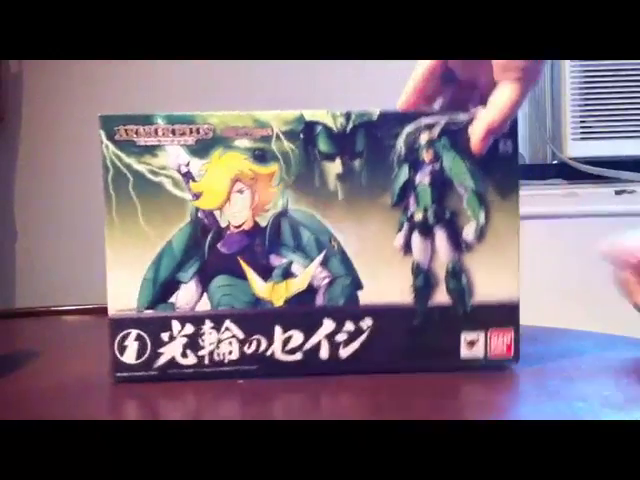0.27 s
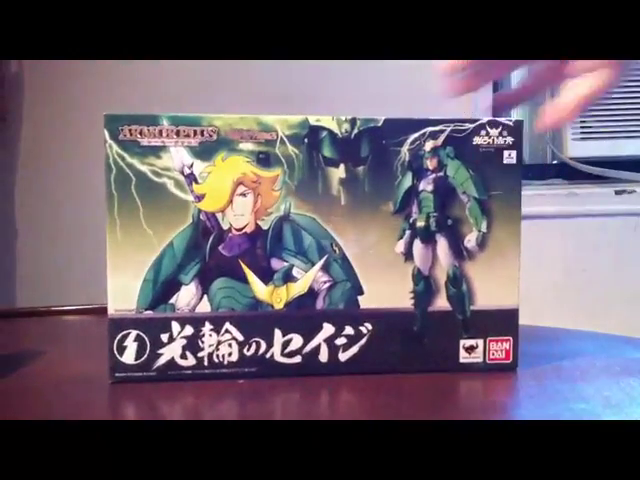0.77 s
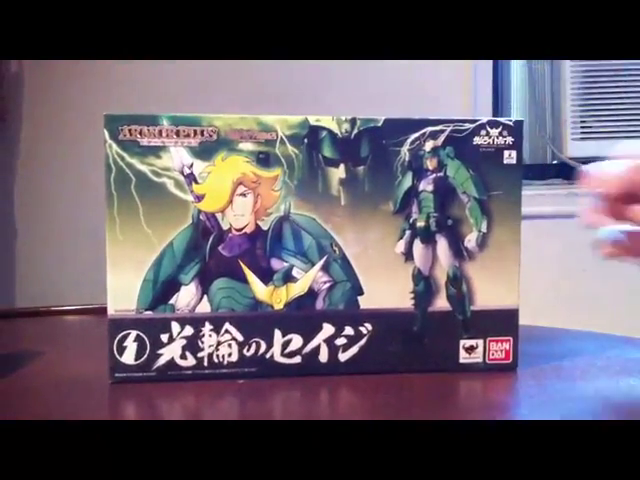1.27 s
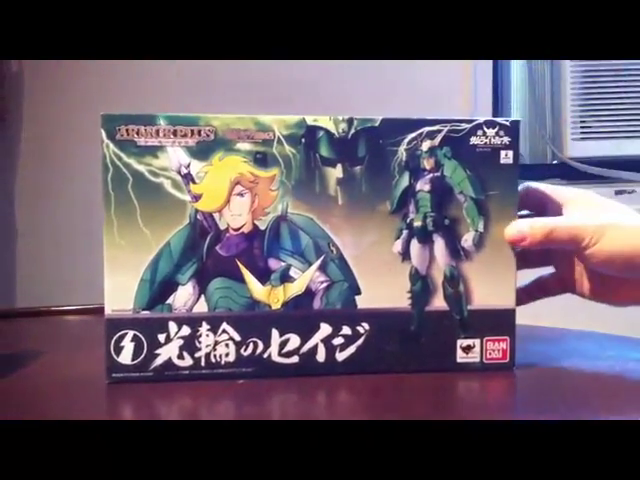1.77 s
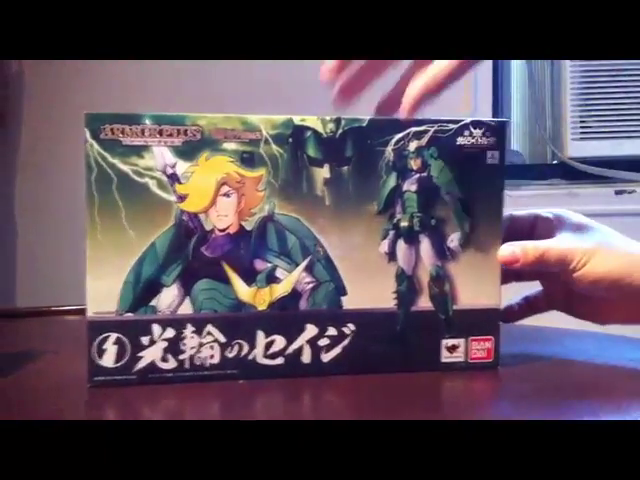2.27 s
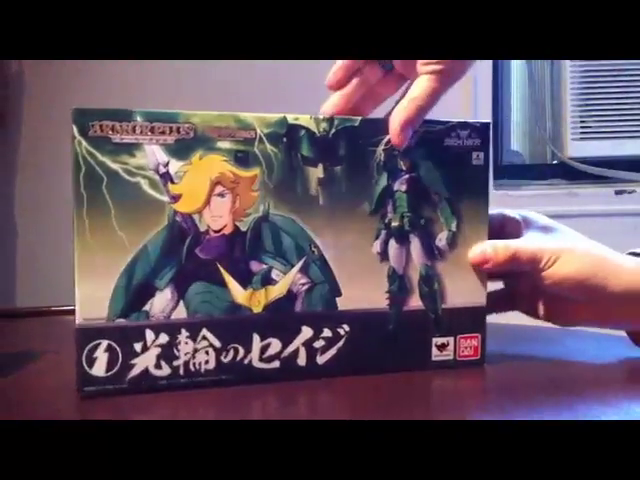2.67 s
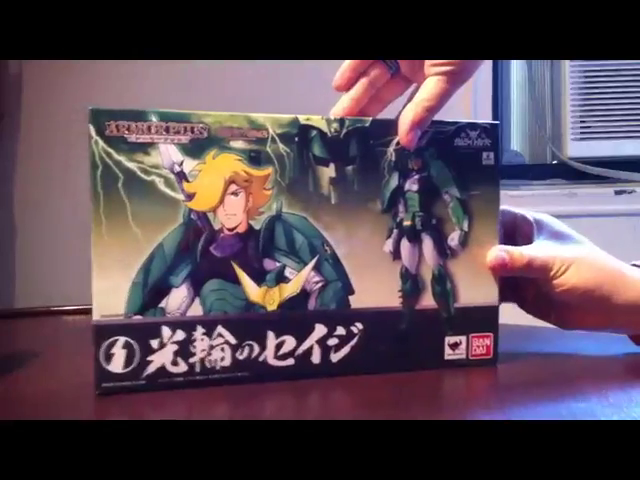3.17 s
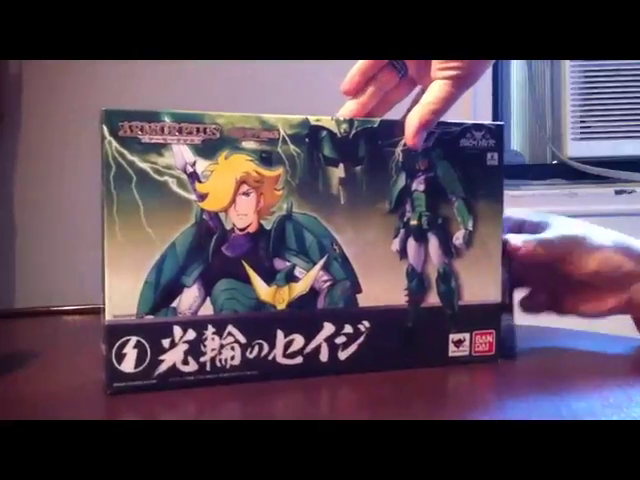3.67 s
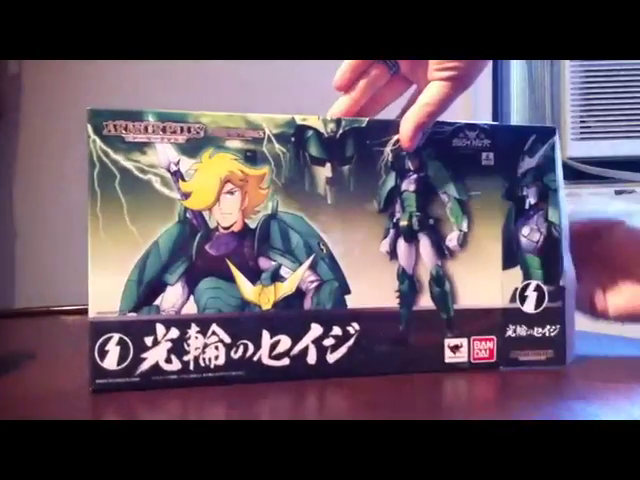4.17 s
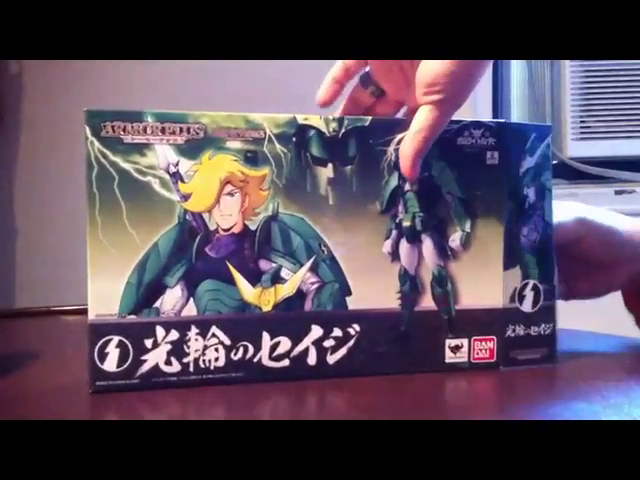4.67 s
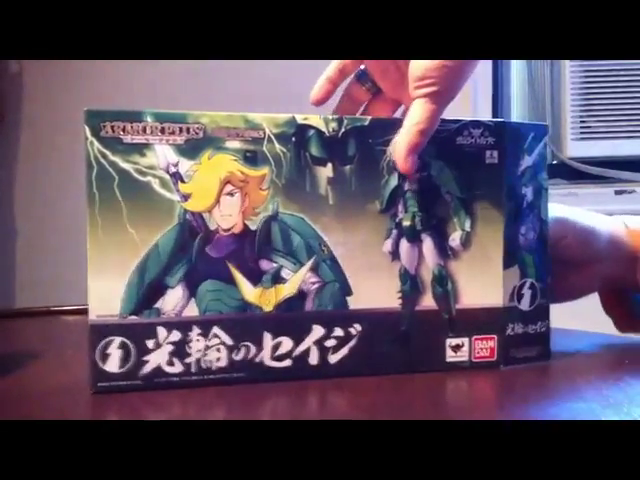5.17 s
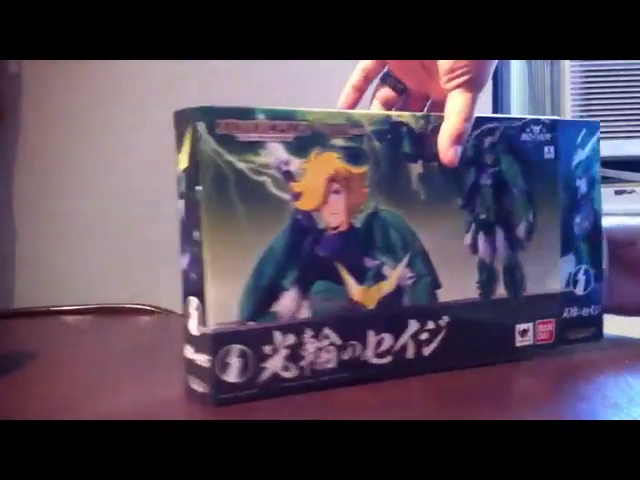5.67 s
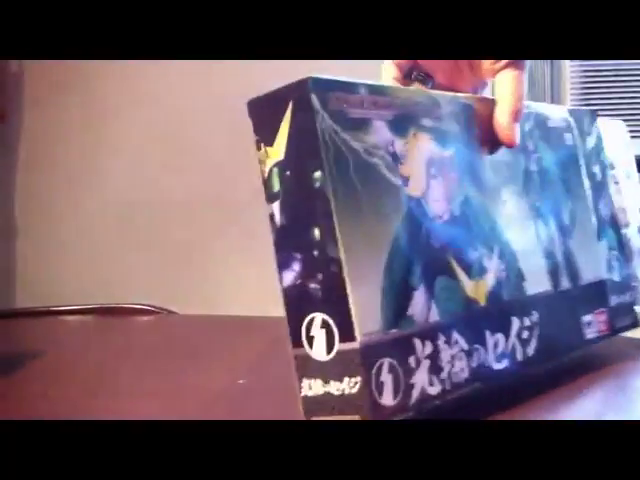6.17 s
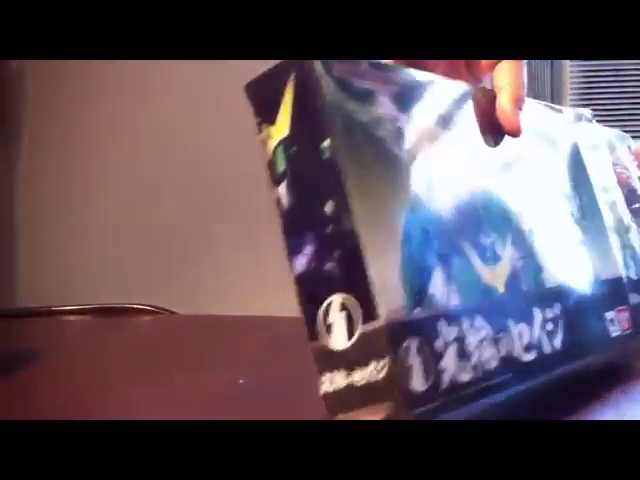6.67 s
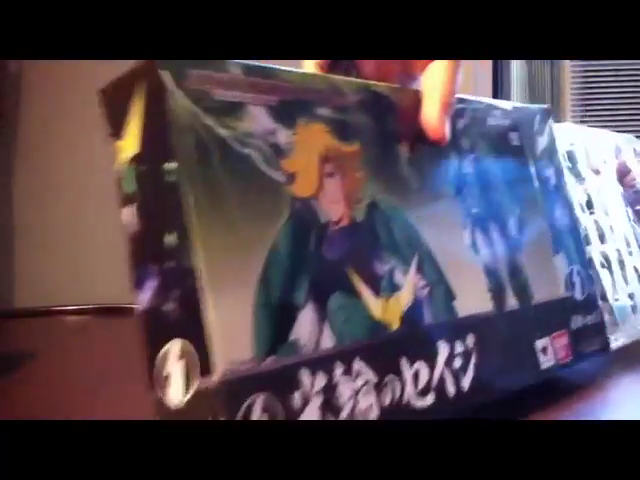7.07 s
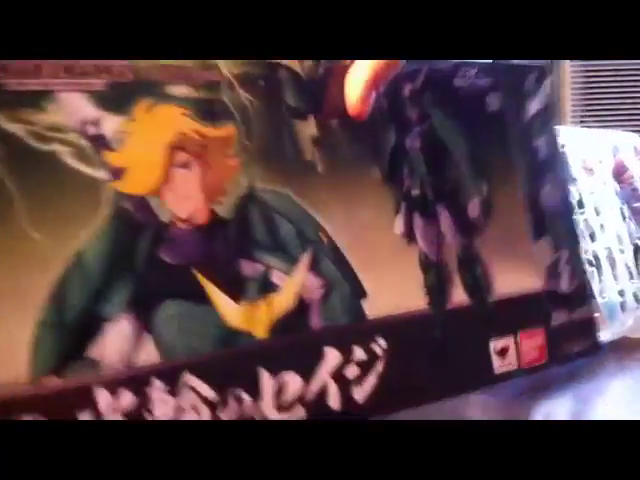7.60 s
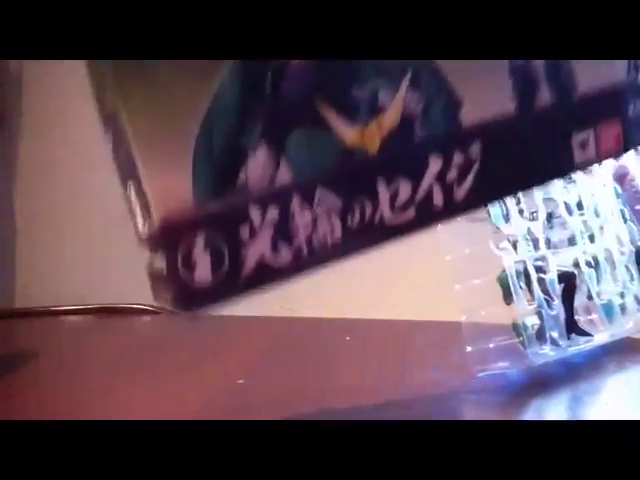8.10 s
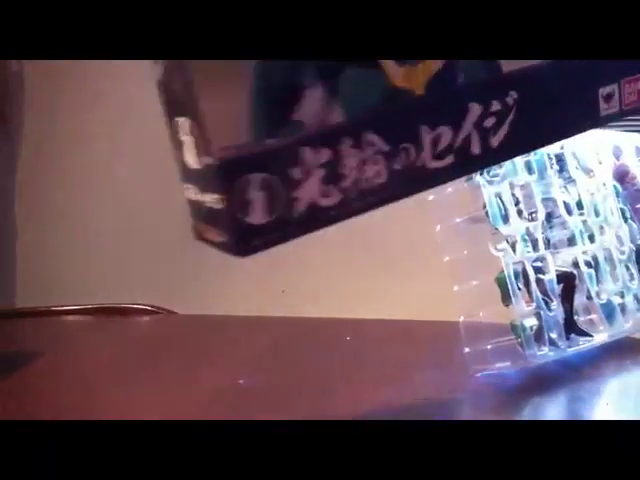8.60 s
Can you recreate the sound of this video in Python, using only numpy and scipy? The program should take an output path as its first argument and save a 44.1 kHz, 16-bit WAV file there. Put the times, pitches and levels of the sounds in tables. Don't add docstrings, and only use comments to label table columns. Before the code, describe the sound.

Close in a small room, fingers lightly tick and brush a card box. A knife is laid on a wooden table with two short clattering knocks. Soft taps follow, then flaps pop and snap open with a heavy hollow thud. A plastic tray grates out in two rough, crackling pulls full of knocks and ticks, ending in faint handling. A small microphone hisses throughout.

```python
import sys
import numpy as np
from scipy import signal
from scipy.io import wavfile
from scipy.ndimage import uniform_filter1d

SR = 44100
rng = np.random.default_rng(int(sys.argv[2]) if len(sys.argv) > 2 else 0)


def volts_from_db(level):
    exponent = np.asarray(level, float) / 20
    return 10 ** exponent


def transcribe(u):
    v = np.clip(np.atleast_2d(u).T, -1, 1)
    q = np.round(v * 32767).astype(np.int16)
    wavfile.write(sys.argv[1], SR, q)


N = 389844

# f/Hz, spectral density level/dB
HOLLOW = [(35, -46), (60, -32.5), (140, -6.5), (310, -6.5), (412, -1), (494, -1.5), (701, -8.5), (900, -12),
          (1170, -46), (1980, -120)]
# f/Hz, spectral density level/dB
PANEL = [(260, -22), (450, -1), (571, 3), (701, -0.5), (912, -6), (1120, -1.5), (1580, -8), (2380, -12),
         (3200, -20.5), (4160, -25), (7040, -120)]
# f/Hz, spectral density level/dB
HISS = [(1180, -15.5), (2000, -3.5), (2870, -4.5), (3200, -7.5), (4790, -9), (10000, -14), (13900, -14.5),
        (15500, -20)]


def evened(x):
    return x / np.sqrt(np.mean(x ** 2) + 1e-20)


def read(points, hz):
    f, value = np.transpose(points)
    return np.interp(np.log(hz + 1), np.log(f + 1), value)


def add(mix, s, sound):
    part = mix[round(s * SR):][:len(sound)]
    part += sound[:len(part)]


def colour(points):
    size = 2 ** 12
    level_db = read(points, abs(np.fft.fftfreq(size, 1 / SR)))
    log_gain = np.log(volts_from_db(np.maximum(level_db, -100)))
    response = np.fft.ifft(np.exp(np.conj(signal.hilbert(log_gain)))).real[:size // 2]
    return response / np.linalg.norm(response)


def passed(x, hz, kind):
    return signal.sosfilt(signal.butter(4, hz, kind, fs=SR, output="sos"), x)


def lumps(shape, samples):
    once = uniform_filter1d(rng.standard_normal(shape), int(samples))
    return evened(uniform_filter1d(once, int(samples)))


def ring(modes, size):
    t = np.arange(size) / SR
    return sum(rng.choice([-1, 1]) * volts_from_db(db - 60 * t / t60) * np.sin(2 * np.pi * hz * t)
               for hz, db, t60 in modes)


def air():
    # f/Hz, spectral density level/dB
    floor = [(15, -63), (25, -2), (92, -3.5), (108, -3.5), (180, -6), (212, 2), (263, -17), (301, -1),
             (326, -1.5), (607, -12), (2610, -19), (16000, -21.5)]
    floor_db, whine_db, whine_hz = -65.5, -85, 15000
    hiss = signal.oaconvolve(rng.standard_normal(N), colour(floor))[:N]
    whine = np.sin(2 * np.pi * whine_hz * np.arange(N) / SR)
    return volts_from_db(floor_db) * hiss + volts_from_db(whine_db) * whine


def plateau(t, start, length):
    rise_db_per_s, fall_db_per_s = 415, 154
    before, after = np.maximum(start - t, 0), np.maximum(t - start - length, 0)
    return -rise_db_per_s * before - fall_db_per_s * after


def effort(t):
    # t/s, pressure level/dB, speed level/dB
    hands = [(0, -51.5, -6), (.12, -67.5, 2), (.5, -61.5, -9.5), (.93, -66, 0), (1.34, -72, -1.5),
             (1.6, -65.5, -4), (2.05, -60.5, -9), (2.38, -66, -4), (2.9, -58.5, -9.5), (3.4, -58, -5.5),
             (3.66, -62, -11), (4.5, -61, -6), (5.15, -60.5, -7), (6.3, -57.5, -14), (7.8, -66, -7),
             (8.02, -65, -4), (8.4, -70.5, -5.5), (8.84, -68, -6)]
    # t/s, pressure level/dB, speed level/dB
    pulls = [
        [(5.24, -56.5, -4.5), (5.306, -49.5, -8), (5.45, -45.5, -6), (5.618, -34, -10), (5.91, -43, -7),
         (6.044, -35, -13), (6.162, -41.5, -13), (6.2, -47, -41)],
        [(6.6, -46, -15), (6.7, -35.5, -12), (6.83, -40, -11.5), (7.07, -34, -11), (7.155, -38.5, -4.5),
         (7.5, -40.5, -3), (7.56, -48.5, 5), (7.6, -43.5, 1), (7.64, -65, -10)],
    ]
    # start t/s, length t/s, pressure level/dB, speed level/dB, weight level/dB
    strokes = [(1.07, 0.12, -56.5, -18, 5), (2.418, 0.32, -57.5, -3.5, 2), (3.701, 0.024, -45.5, 3.5, 4),
               (3.894, 0.1, -48.5, -7, 4.5), (3.997, 0.32, -60, 0, 0), (4.53, 0.28, -61, -0.5, 0),
               (6.1, 0.028, -47.5, -9.5, -13), (6.384, 0.061, -46, -4.5, -6), (7.62, 0.14, -56, -9.5, -1.5),
               (7.55, 0.027, -50, 7.5, -13), (3.12, 0.077, -56, -12.5, 3), (5.795, 0.011, -54, 6, -10),
               (5.96, 0.019, -48.5, 5, -10), (5.466, 0.024, -48, -1, 1), (3.764, 0.018, -54, -4, 3)]
    s, press, speed = np.transpose(hands)
    press = np.interp(t, s, press)
    total = volts_from_db([press - 0.5, press, press + np.interp(t, s, speed)]) ** 2
    for pull in pulls:
        s, press, speed = np.transpose(pull)
        press = np.interp(t, s, press)
        hollow_db = -45 + 0.55 * (press + 42)
        parts = [hollow_db, press, press + np.interp(t, s, speed)]
        total += volts_from_db(parts) ** 2 * (t >= s[0]) * (t < s[-1])
    for start, length, db, speed, weight in strokes:
        total += volts_from_db(db + np.array([[weight], [0], [speed]]) + plateau(t, start, length)) ** 2
    return np.sqrt(total)


def crackle():
    creases_per_s, crackle_db, pitches = 270, -11.5, 16
    out = np.zeros(N)
    for hz in np.geomspace(900, 11000, num=pitches):
        sizes = volts_from_db(10 * np.minimum(rng.exponential(1, N), 3))
        impulses = sizes * (rng.random(N) < creases_per_s / pitches / SR)
        out += signal.oaconvolve(impulses, ring([(hz, 0, 9 / hz)], size=512))[:N]
    return volts_from_db(crackle_db) * evened(out)


def table_hum(t, hollow_gain):
    # from t/s, to t/s
    lifted = [
        (6.15, 6.75),
        (7.45, 8.1),
    ]
    hum_db, hum_share, lifted_db = -65.5, 0.28, -9
    rumble = signal.oaconvolve(rng.standard_normal(N), colour(HOLLOW))[:N]
    hum = volts_from_db(hum_db) * (hollow_gain / volts_from_db(-55)) ** hum_share
    hum += volts_from_db(-55 + plateau(t, 7.7, 0.22))
    off_table = sum((t > a) * (t < b) * 1. for a, b in lifted)
    hum *= volts_from_db(lifted_db * uniform_filter1d(off_table, size=2000))
    return hum * volts_from_db(3 * lumps(N, 1500)) * evened(passed(rumble, 229, "low"))


def rubbing():
    slips_per_s, slip_spread_db = 2500, 2
    t = np.arange(N) / SR
    gains = np.repeat(effort(t[::32]), 32, axis=1)[:, :N]
    sizes = volts_from_db(slip_spread_db * np.minimum(rng.exponential(1, N), 5))
    slips = sizes * (rng.random(N) < slips_per_s / SR)
    slips = evened(slips * rng.choice([-1, 1], N))
    pressure = lumps(N, 520)
    out = table_hum(t, gains[0]) + gains[-1] * crackle()
    for shape, gain, grain, lump_db in zip((HOLLOW, PANEL, HISS), gains, (.7, .6, .4), (.9, .9, .7)):
        own = 1.07 * lumps(N, 120)
        drive = grain * slips + (1 - grain) * rng.standard_normal(N)
        drive = drive * volts_from_db(lump_db * pressure + own)
        out += gain * evened(passed(signal.oaconvolve(drive, colour(shape))[:N], 300, "high"))
    return out


def taps():
    # t/s, strength level/dB, weight level/dB (hollow), hardness level/dB (crack)
    touches = [(.007, -53.5, -21, 7), (.026, -72, -9, 6), (.078, -57.5, -25, 12.5), (.106, -72, -2.5, 30.5),
               (.121, -78, 2.5, 39), (.454, -47.5, 6, -7), (.478, -44.5, -1, -24), (.61, -43.5, -3, -9.5),
               (.864, -69.5, -6, 22.5), (1.807, -54, 2.5, -4), (1.879, -50.5, 9.5, -9),
               (2.221, -47.5, 7.5, -8), (2.487, -38, -1, -10.5), (2.52, -44, 2.5, -10),
               (2.579, -47, 6, -11), (2.736, -53, 13, -8), (2.774, -38.5, -9, -3), (2.789, -38.5, 1, -8),
               (2.803, -40.5, 8, -9.5), (2.949, -47.5, -1, -12), (3.05, -49, 4.5, -27),
               (3.083, -47.5, -1, -29), (3.618, -46, -1.5, -11)]
    snaps = [(3.678, -23.5, -6, -4), (3.708, -34, 2, -16), (3.75, -35.5, -9, -25), (3.772, -31, -16, -6),
             (3.88, -75, 11, -1.5), (3.94, -23, -4.5, -12.5), (3.999, -37.5, -15, -10),
             (4.029, -39.5, -8, -9.5), (4.125, -70.5, 21, 20.5), (4.339, -54, 5, -5),
             (4.707, -47.5, 2, -19), (4.734, -30.5, -6.5, -11), (4.873, -42.5, -4, -6.5),
             (4.981, -43, -29, -10), (5.05, -68, 13, -13)]
    jolts = [(5.255, -42.5, -29, -23), (5.381, -37, -6, -18), (5.55, -33, -7, 1.5), (5.614, -51, -11, 11),
             (5.751, -33, -17, -10), (5.975, -27.5, -14, -20), (6.508, -36, -13, -1), (6.679, -41, -8, -3),
             (6.759, -40, -20, -5), (6.865, -34, 1, -7), (7.052, -31, 3, -12), (7.079, -33.5, -6, -9),
             (7.173, -31.5, -4, -24), (7.384, -31.5, -2, -4), (7.419, -34.5, -13, -5.5),
             (7.96, -51, -1, -23), (8.081, -63, -11, 10), (8.282, -50, -23, -8), (8.817, -62, 3, 9)]
    scuffs = [(.16, -63, -17, 26.5), (.239, -51, -18, 2), (1.673, -52.5, 1.5, -10), (1.754, -53.5, -2, -8),
              (3.119, -56, 14, -27), (3.159, -56.5, 5, 0), (3.305, -50, 6, -7), (4.178, -46.5, -4, -3),
              (4.455, -50, 3.5, -7), (4.479, -50, -2, -6.5), (4.561, -44.5, -1, -9),
              (4.913, -54.5, 6.5, -14), (6.088, -32.5, -8, -7.5), (6.243, -50, -27, 3),
              (6.371, -46.5, -14, 4), (6.395, -41, -20, 5.5), (6.951, -37.5, -2, -1),
              (7.758, -49, -3.5, -1.5), (7.916, -54.5, -1, -29)]
    t, out = np.arange(SR // 4) / SR, np.zeros(N)
    shapes = [colour(shape) for shape in (HOLLOW, PANEL, HISS)]
    kinds = (touches, 0.1), (snaps, 0.12), (jolts, 0.12), (scuffs, 0.26)
    rows = [(*row, t60) for contacts, t60 in kinds for row in contacts]
    stutter_db = 2.15 * lumps((len(rows), 1, len(t)), 99) - 2.0
    noise = rng.standard_normal((len(rows), 3, len(t))) * volts_from_db(stutter_db)
    slowness, rises_s = (1.3, 1.05, .8), (.002, .0006, .0003)
    for (s, db, weight, hard, t60), rattle in zip(rows, noise):
        for shape, part_db, z, slow, rise in zip(shapes, (weight, 0, hard), rattle, slowness, rises_s):
            fall = volts_from_db(-60 * t / (slow * max(t60, .01))) + 0.87 * np.exp(-t / 0.00049)
            drive = z * fall * (1 - np.exp(-t / rise))
            add(out, s, volts_from_db(db + part_db) * signal.fftconvolve(drive, shape))
    return out


def clicks():
    # t/s, peak level/dB, f/Hz, t60/s
    ticks = [(0.0074, -36, 6130, 0.0087), (0.027, -34.5, 2660, 0.008), (0.044, -40, 2600, 0.007),
             (0.079, -29, 2650, 0.0076), (0.109, -39, 2750, 0.007), (0.1201, -43, 2700, 0.007),
             (0.1654, -45, 2750, 0.007), (0.8654, -41, 8490, 0.007), (3.1697, -40, 3760, 0.007),
             (3.6787, -12.5, 2830, 0.006), (4.1899, -40, 3370, 0.0094), (5.5523, -34, 2860, 0.0059),
             (6.2425, -32, 5750, 0.007), (6.327, -40, 12000, 0.009), (6.381, -32, 5230, 0.006),
             (6.3945, -23.5, 4640, 0.007), (6.5092, -21, 6250, 0.0099), (6.6797, -31.5, 6300, 0.0089),
             (6.7575, -36, 2680, 0.007), (7.0534, -19, 2900, 0.0064), (7.3841, -35, 11100, 0.0064),
             (7.7662, -43, 6400, 0.0062), (8.081, -53, 3860, 0.007), (8.8184, -41, 11790, 0.0093)]
    bumps = [(0.157, -34, 1900, 0.024), (0.161, -26.5, 1254, 0.024), (0.61, -30, 1110, 0.023),
             (1.877, -35.5, 510, 0.035), (2.22, -22.5, 367, 0.024), (2.772, -28, 513, 0.03),
             (2.802, -39, 500, 0.027), (2.946, -35, 664, 0.034), (3.082, -40, 415.6, 0.034),
             (3.116, -50, 516, 0.03), (3.158, -31, 546, 0.017), (3.942, -6.5, 420, 0.023),
             (4.569, -29.5, 500, 0.039), (4.872, -30, 154, 0.05), (5.502, -33, 494, 0.031),
             (5.551, -19, 1085, 0.026), (5.698, -24.5, 1160, 0.052), (5.752, -23, 1170, 0.025),
             (5.977, -12, 1180, 0.012), (6.086, -9, 398, 0.018), (6.864, -28.5, 990, 0.12),
             (7.079, -28, 636, 0.03), (7.174, -23, 990, 0.037), (7.696, -45, 350, 0.23),
             (8.281, -58, 503, 0.02)]
    # t/s, peak level/dB, f/Hz, t60/s
    thuds = [
        (2.224, -42, 225, 0.1),
        (3.944, -19.5, 266, 0.042),
        (7.071, -23, 132, 0.054),
    ]
    out, t = np.zeros(N), np.arange(SR // 10) / SR
    for s, db, hz, t60 in ticks + bumps + thuds:
        pair = ring([(hz, 0, t60), (1.155 * hz, -5, 0.54 * t60)], size=len(t))
        add(out, s, volts_from_db(db - 1.0) * pair * (1 - np.exp(-t * hz / 1.12)))
    return out


def creases():
    # t/s, peak level/dB, f/Hz, number of cycles
    cracks = [(.0075, -47, 11000, 3.5), (0.109, -40, 6300, 4), (.1205, -41, 6330, 4), (.128, -42, 6300, 4),
              (0.1625, -32, 12500, 3), (0.162, -38, 6050, 1.7), (.168, -31, 8000, 2), (.186, -34, 9000, 2),
              (.4384, -51, 2690, 3), (.085, -43, 6300, 5), (0.866, -42, 6000, 1.4), (.984, -36, 11100, 2.6),
              (1.216, -19.5, 7060, 0.61), (1.824, -52, 5000, 1), (2.5694, -53, 5000, 1.3),
              (2.7365, -50, 4000, 1.5), (2.793, -43, 5030, 1), (3.1697, -43, 8000, 1.3),
              (3.3436, -51, 2910, 2), (3.6791, -24.5, 6200, 4.3), (3.6795, -31, 13000, 2.2),
              (3.9413, -31, 4960, 1.1), (3.9811, -31, 2970, 1.3), (4.004, -42, 5500, 1.8),
              (4.17, -43, 6000, 1.3), (4.4691, -49, 10600, 4), (4.6083, -43, 11000, 1.3),
              (4.704, -56, 9000, 1.5), (4.741, -39, 3970, 1.5), (4.803, -40, 5000, 1.4),
              (4.958, -50, 13000, 2), (5.3631, -45, 9000, 1.5), (5.4633, -37, 10000, 0.91),
              (5.5347, -36, 4000, 1.5), (5.554, -38, 12000, 1.1), (5.728, -32, 3500, 2.2),
              (5.7901, -36, 10000, 1.2), (5.9123, -36, 7450, 1.4), (5.9593, -36, 9000, 1),
              (6.03, -41, 6000, 5), (6.0772, -39, 3940, 1.2), (6.243, -35, 11000, 1.5),
              (6.5095, -33.5, 10500, 2.3), (6.6556, -35, 5000, 1.3), (7.0545, -27, 13600, 2),
              (7.3416, -48, 5000, 2), (7.369, -42, 11000, 2), (7.425, -35, 11000, 1.5),
              (7.518, -37, 12000, 1.5), (7.55, -32, 10000, 1.5)]
    pats = [(.249, -43, 895, 2), (.3, -41.5, 784, 0.97), (.9762, -21.5, 1390, 1.7), (.9872, -22, 900, 1.1),
            (1.2112, -20, 1310, 1.1), (3.6793, -14.5, 940, 0.73), (3.752, -26, 506, 1.1),
            (3.941, -28, 149, 1.15), (7.25, -47, 103, 2.7), (5.977, -48, 70, 0.53), (3.9452, -14, 398, 1),
            (4.469, -45, 194, 1.6), (7.768, -40.5, 690, 1.7), (7.96, -46, 604, 2.4),
            (8.2815, -52, 1860, 2.7), (8.288, -54, 1010, 1.9), (4.735, -33, 1100, 0.62),
            (4.882, -41.5, 595, 1), (4.915, -41, 900, 1.8), (5.505, -29.5, 510, 1.2),
            (5.541, -29, 900, 1.8), (5.614, -28, 1420, 2.4), (5.649, -29.5, 1260, 3),
            (5.674, -35, 544, 1.4), (5.9755, -18, 1150, 1.5), (5.98, -20.5, 790, 1.5), (3.135, -41, 500, 2),
            (3.145, -41, 600, 1.6), (3.2, -45, 550, 1.8), (6.168, -34, 493, 1.8), (6.606, -43, 503, 3),
            (6.793, -36, 1180, 1.6), (7.01, -31, 604, 2.3), (7.085, -28, 700, 0.89),
            (7.1735, -21.5, 1000, 1.4), (7.242, -30.5, 563, 2.1), (7.392, -27, 494, 1.4),
            (7.512, -42, 464, 2)]
    splinter_db, splinter_t60 = -24, .035
    out, t = np.zeros(N), np.arange(SR // 20) / SR
    events = cracks + pats
    splinters = rng.standard_normal((len(events), len(t))) ** 3
    splinters = splinters * volts_from_db(splinter_db - 60 * t / splinter_t60)
    for (s, db, hz, cycles), after in zip(events, splinters):
        u = t * hz / max(cycles, .3) * 2
        burst = np.sin(2 * np.pi * hz * t) * u * np.exp(1 - u)
        trail = signal.fftconvolve(after, burst) / np.linalg.norm(burst)
        add(out, s, volts_from_db(db) * (burst + trail[:len(t)]))
    return out


def knife():
    # t/s, ring level/dB, table boom level/dB, clatter level/dB, contact t/s
    knocks = [
        (0.976, -21.5, -43, 0, 0.0137),
        (1.211, -23.5, -50.5, 0, 0.0076),
    ]
    # f/Hz, level/dB, t60/s
    table_modes = [(155, -9, .3), (204, -4, .35), (285, -10, .3), (313, -1.5, .45), (348, -7, .45),
                   (425, -10, .2)]
    # f/Hz, level/dB, t60/s
    knife_modes = [(895, -2, .16), (1075, -2.5, .18), (1235, -4, .09), (1335, 0, .1), (1560, -8, .1),
                   (2100, -11, .11), (2720, -10, .09)]
    free_s, mute_db_per_s, mute_db = (0.133, 0.054), 600, -14.5
    out = np.zeros(N)
    wood, blade = ring(table_modes, size=SR // 2), ring(knife_modes, size=SR // 4)
    t = np.arange(SR // 5) / SR
    wood_t = np.arange(len(wood)) / SR
    for (s, db, boom_db, clatter_db, contact), free in zip(knocks, free_s):
        boom = wood * volts_from_db(np.clip(mute_db_per_s * (free - wood_t), mute_db, 0))
        boom = boom * volts_from_db(3 * lumps(len(wood), 400))
        chatter = rng.standard_normal(len(t)) ** 3 * np.exp(-(t / contact) ** 2) + 40 * (t == 0)
        chatter /= np.linalg.norm(chatter)
        push = np.exp(-((t - 0.58 * contact) / 0.00037) ** 2)
        boom = signal.fftconvolve(push / push.sum(), boom)
        add(out, s, volts_from_db(boom_db) * passed(boom, 123, "high") * 10)
        add(out, s, volts_from_db(db - 3.5) * signal.fftconvolve(chatter, blade))
        for shape, part_db, fade, swell in ((HISS, -11, .008, .007), (PANEL, -4, .027, .001)):
            fall = np.exp(-np.maximum(t - contact, 0) / fade)
            rattle = rng.standard_normal(len(t)) * fall * np.minimum(t / swell, 1) ** 2
            rattle = passed(signal.fftconvolve(rattle, colour(shape)), 960, "high")
            add(out, s, volts_from_db(db + clatter_db + part_db) * rattle)
    return out


def flap_pops():
    # t/s, level/dB, snap f/Hz, box air f/Hz
    releases = [
        (2.654, -13.5, 880, 296),
        (2.6891, -15, 890, 294),
        (2.807, -24.5, 900, 454),
    ]
    out, t = np.zeros(N), np.arange(SR // 20) / SR
    for s, db, snap_hz, air_hz in releases:
        snap = 3.4 * np.sin(2 * np.pi * snap_hz * t ** 0.93 / 2) * np.exp(-t / 0.00024)
        swing = 0.34 * np.sin(2 * np.pi * air_hz * (t - .0016))
        swing = swing * np.exp(-(t / 0.0075) ** 2) * (1 - np.exp(-t / 0.0012))
        add(out, s, volts_from_db(db) * (snap + swing))
    return passed(passed(out, 2740, "low"), 133, "high")


def patchy(x, patchy_db):
    z = signal.stft(x, nperseg=256, noverlap=192)[2]
    patches = uniform_filter1d(rng.standard_normal(z.shape), size=7, axis=0)
    patches = uniform_filter1d(patches, size=22, axis=1)
    z = z * volts_from_db(patchy_db * evened(patches) - 1.5)
    return signal.istft(z, nperseg=256, noverlap=192)[1][:N]


def facing(x):
    # t/s, treble level/dB
    turns = [(0, -6), (.3, 1.5), (.9, 1.5), (1.3, 3), (2.3, -2), (4.7, 0), (6.15, -1), (6.28, 8),
             (6.4, -6.5), (6.58, 5), (7.4, -2), (8.84, 5.5)]
    top = signal.sosfiltfilt(signal.butter(2, 7000, "high", fs=SR, output="sos"), x)
    lift_db = np.interp(np.arange(N) / SR, *np.transpose(turns))
    return x + (volts_from_db(lift_db) - 1) * top


def room(x):
    # f/Hz, t60/s
    decay = [(100, 0.52), (260, 0.47), (700, 0.24), (1840, 0.34), (4850, 0.3), (12800, 0.32)]
    tail = np.zeros(SR // 2)
    at = np.arange(200, len(tail) - 20, 20)
    tail[at + rng.integers(0, 20, len(at))] = rng.choice([-1., 1.], len(at))
    hz, t, z = signal.stft(tail, SR, nperseg=256)
    z = z * volts_from_db(-60 * t / read(decay, hz)[:, None])
    tail = signal.istft(z, SR, nperseg=256)[1]
    return signal.fftconvolve(x, tail / np.linalg.norm(tail))[:N]


def hushed(x):
    hushes = [
        (.149, .157, 4500),
        (.961, .9745, 1300),
        (1.193, 1.2095, 2200),
        (3.9325, 3.9375, 1600),
        (4.724, 4.731, 3000),
        (6.2315, 6.239, 3200),
        (6.492, 6.506, 7000),
        (7.045, 7.051, 9500),
        (7.372, 7.382, 9500),
    ]
    out = x.copy()
    for start, end, hz in hushes:
        a, size = round(start * SR), round((end - start) * SR)
        high = signal.butter(4, hz, "high", fs=SR, output="sos")
        top = signal.sosfiltfilt(high, x[:, :a + size])[0, a:]
        add(out[0], start, -.93 * top * signal.windows.tukey(size, .3))
    return out


def scene():
    room_db = -9
    near = facing(patchy(rubbing(), patchy_db=1.6) + taps())
    laid = knife()
    close = flap_pops() + clicks()
    echo = room(near + laid + volts_from_db(-11.0) * close)
    return (near + laid + close + volts_from_db(room_db) * echo + air() + creases())[None]


def band_limit(x):
    return signal.sosfilt(signal.butter(12, 16430, fs=SR, output="sos"), x)


def record(dry):
    edge_hz = 15850
    murmur = volts_from_db(-89.5) * evened(signal.lfilter([1], [1, -.995], rng.standard_normal(dry.shape)))
    jolt = volts_from_db(-37.0) * passed(abs(dry), 81, "low")
    wide = passed(dry, 93.0, "high") + murmur + jolt
    band = signal.firwin(511, edge_hz, window=("kaiser", 9), fs=SR)[None]
    return band_limit(signal.oaconvolve(hushed(wide), band, "same"))


dry = scene()
out = record(dry)
transcribe(out)
```